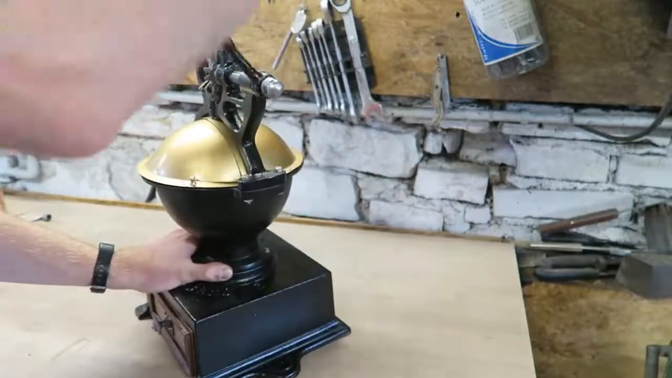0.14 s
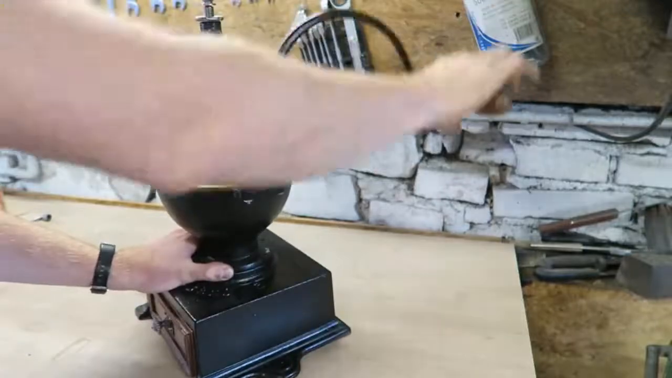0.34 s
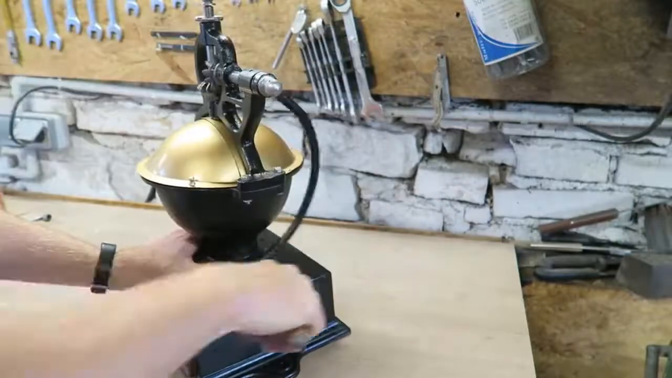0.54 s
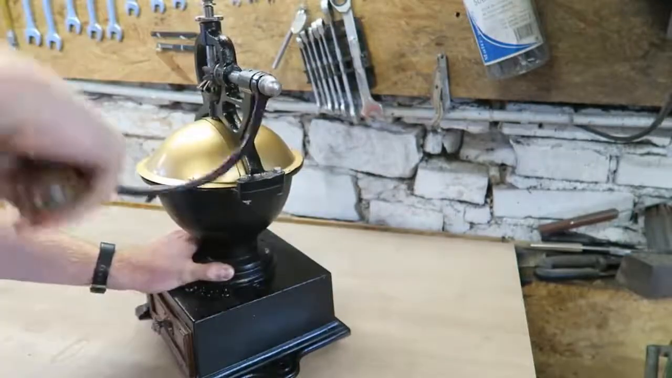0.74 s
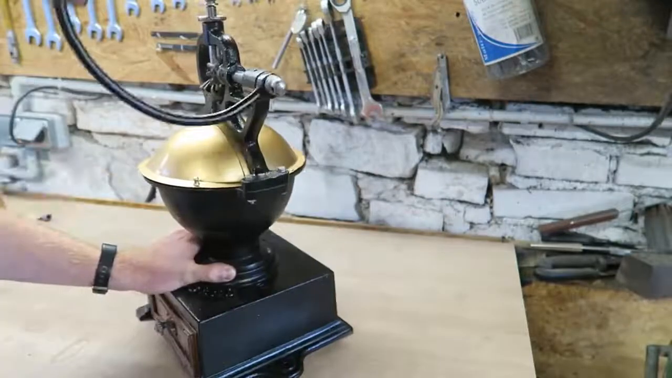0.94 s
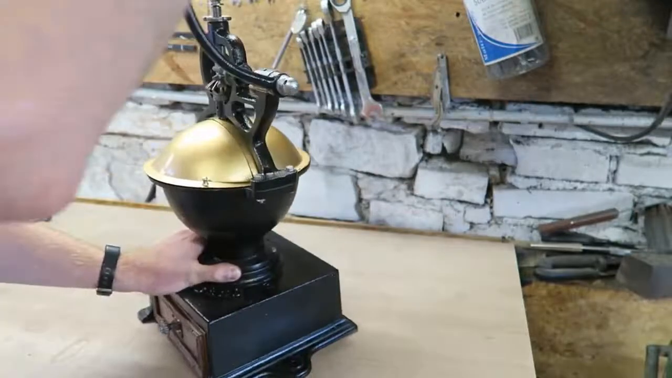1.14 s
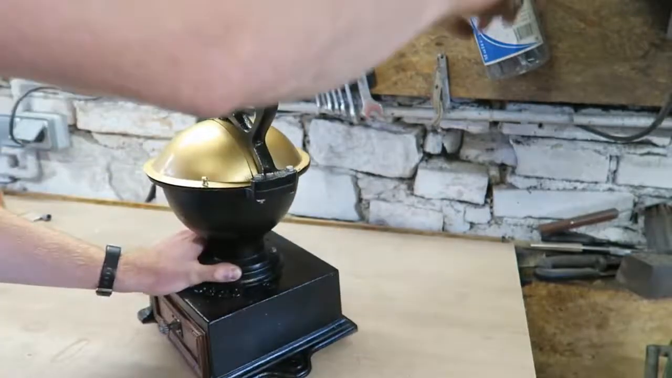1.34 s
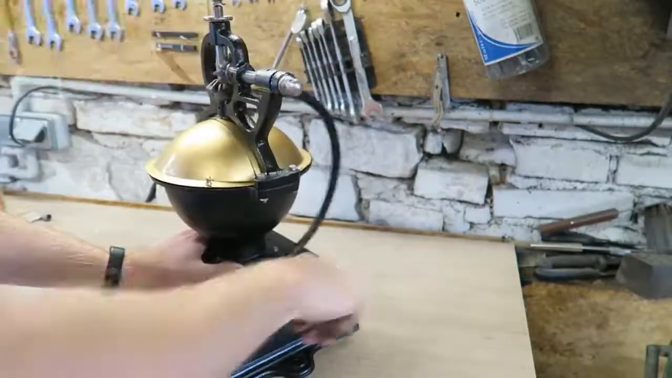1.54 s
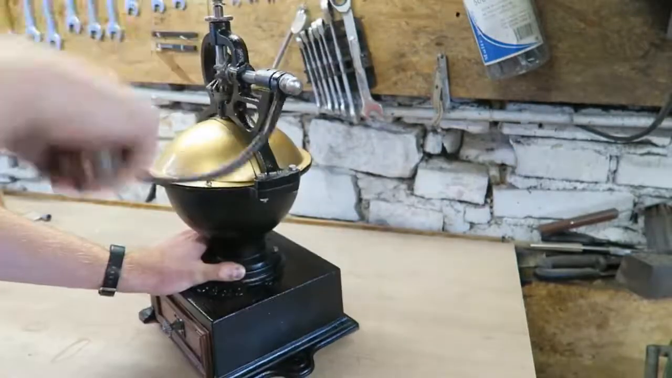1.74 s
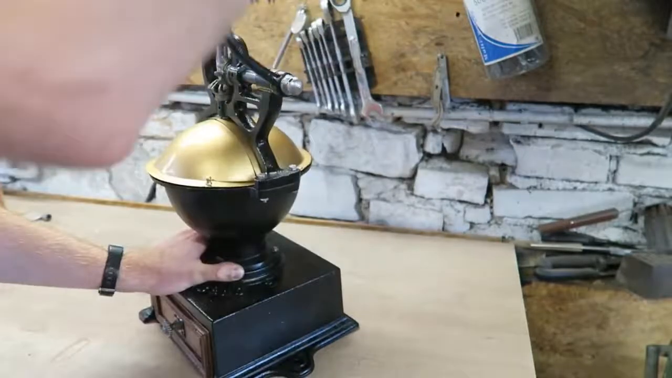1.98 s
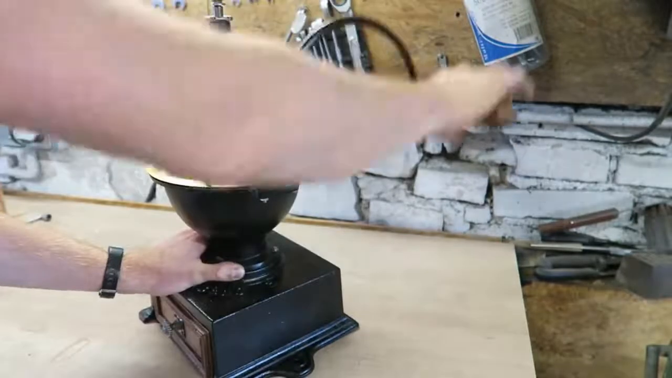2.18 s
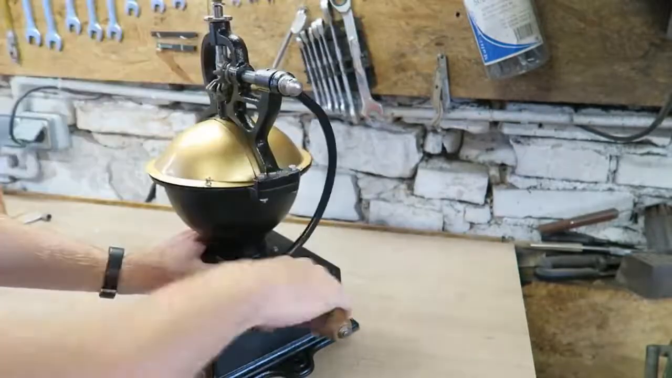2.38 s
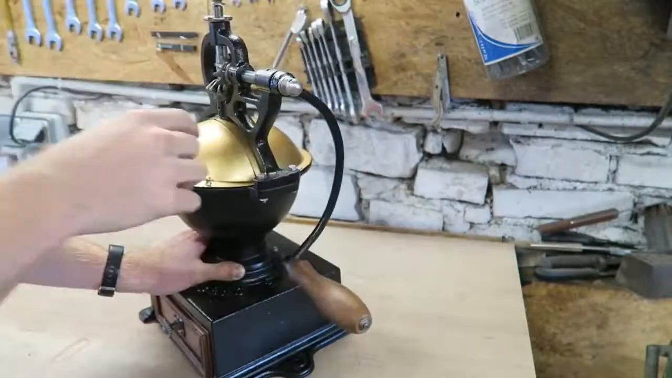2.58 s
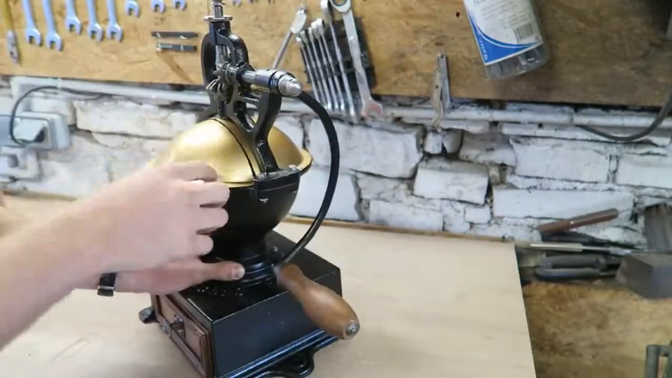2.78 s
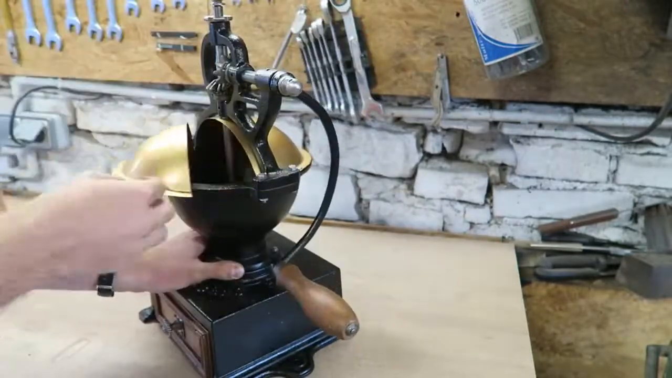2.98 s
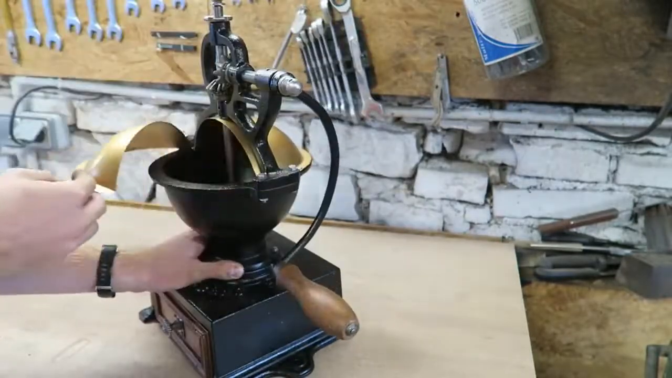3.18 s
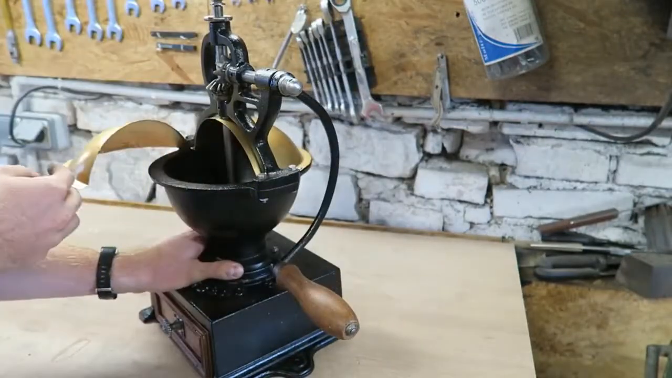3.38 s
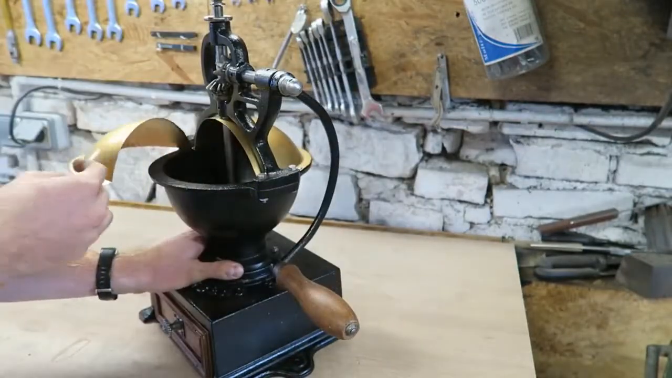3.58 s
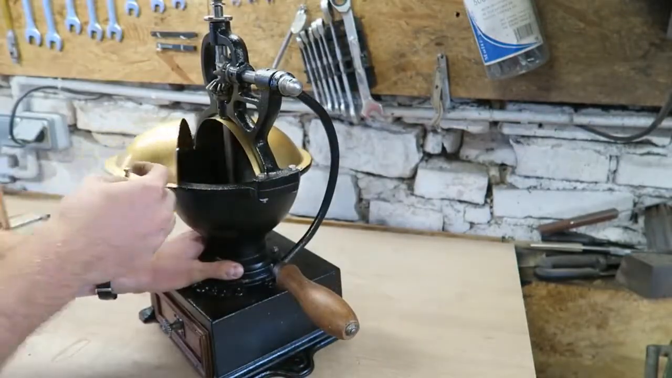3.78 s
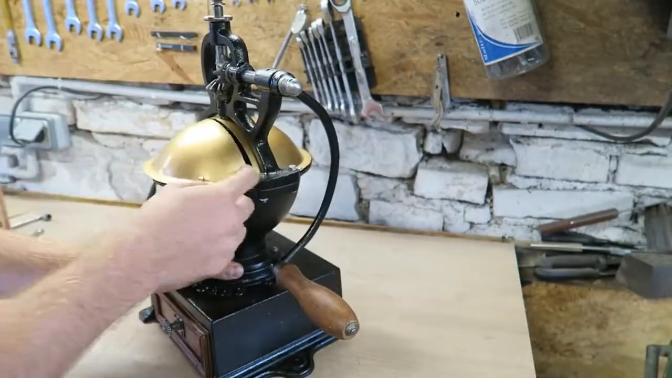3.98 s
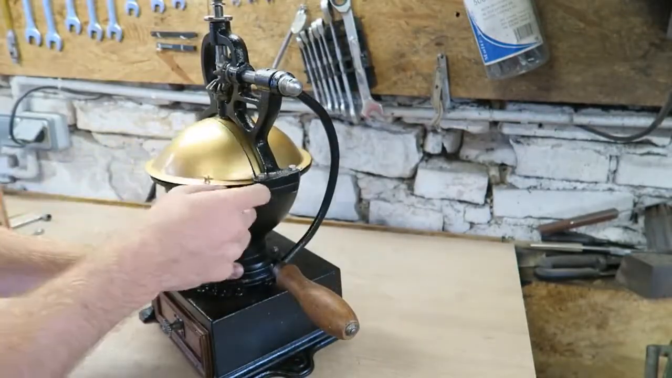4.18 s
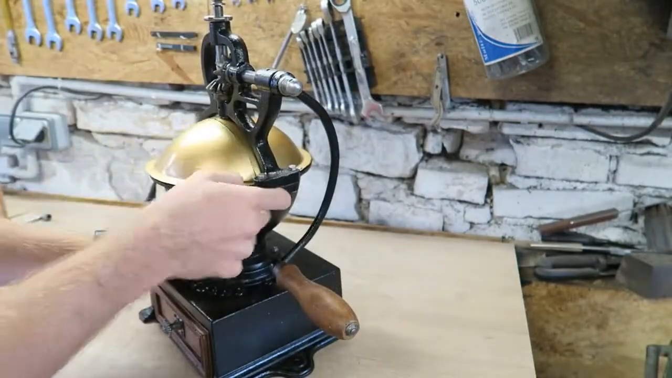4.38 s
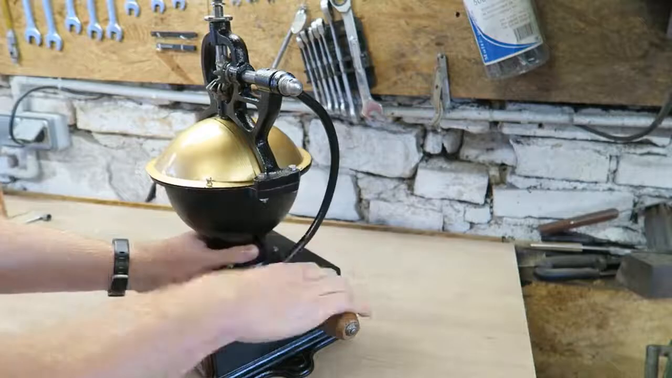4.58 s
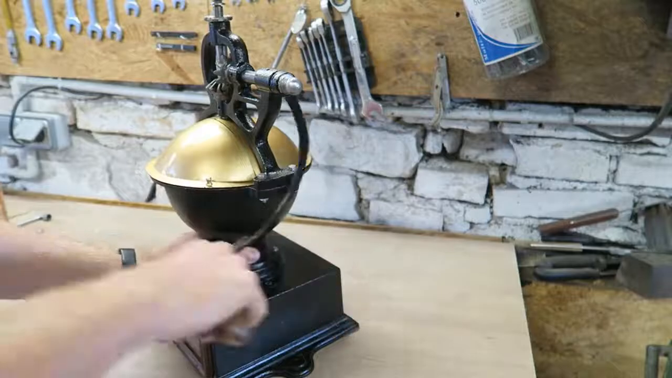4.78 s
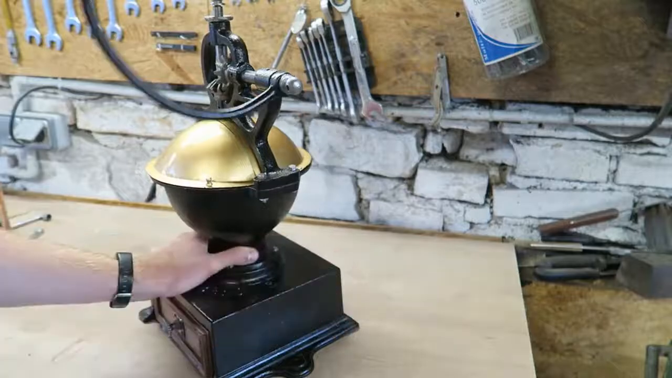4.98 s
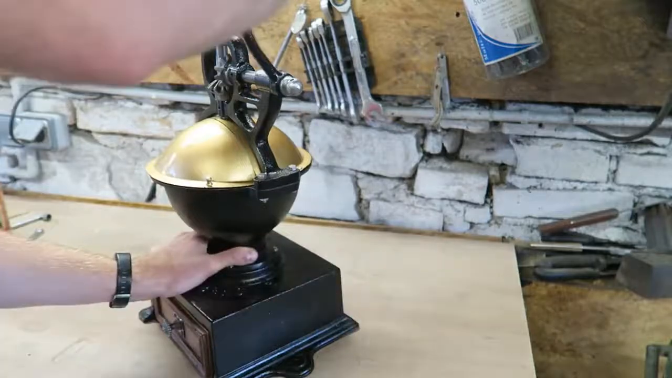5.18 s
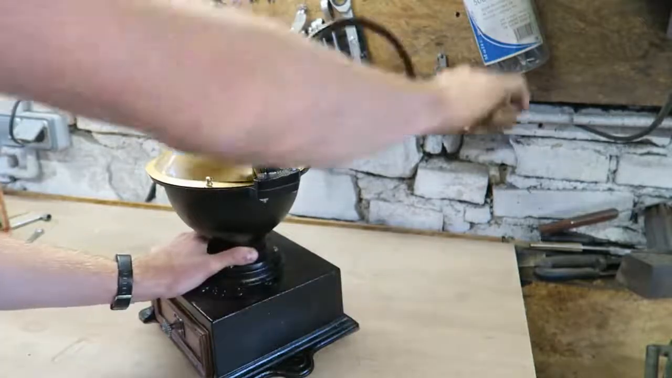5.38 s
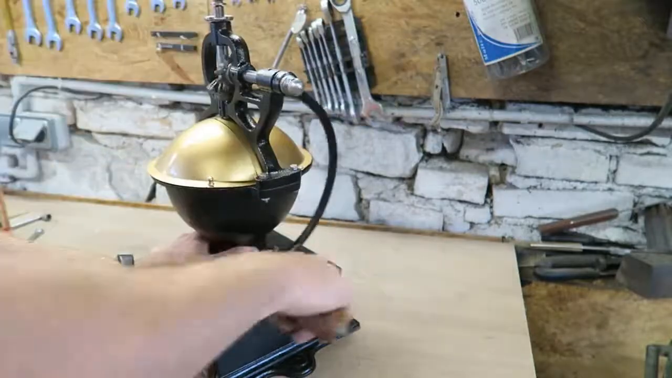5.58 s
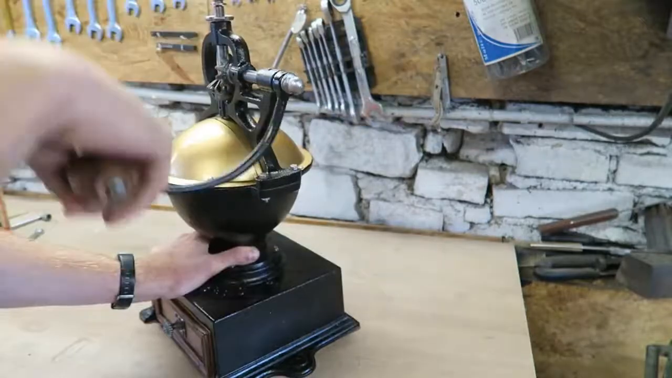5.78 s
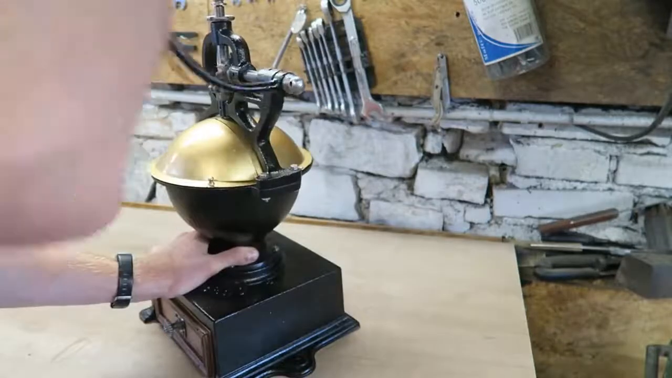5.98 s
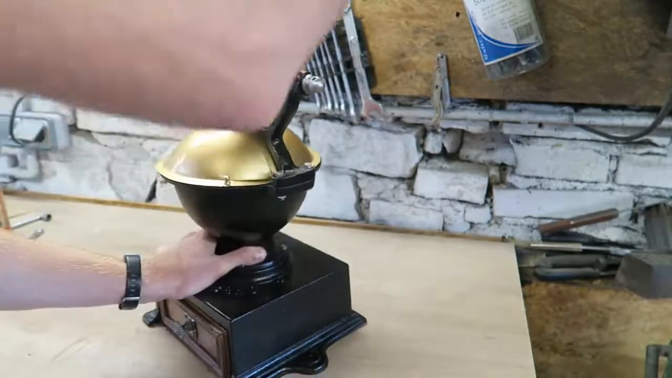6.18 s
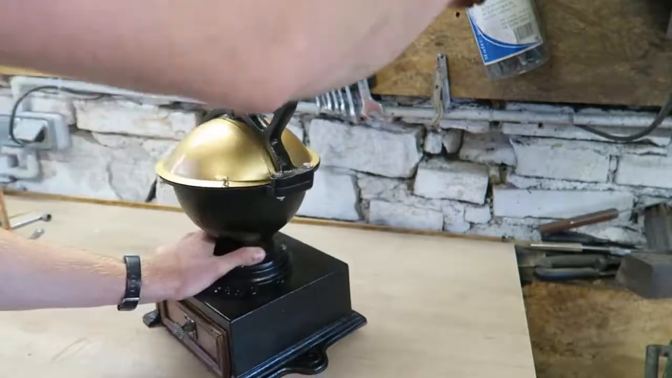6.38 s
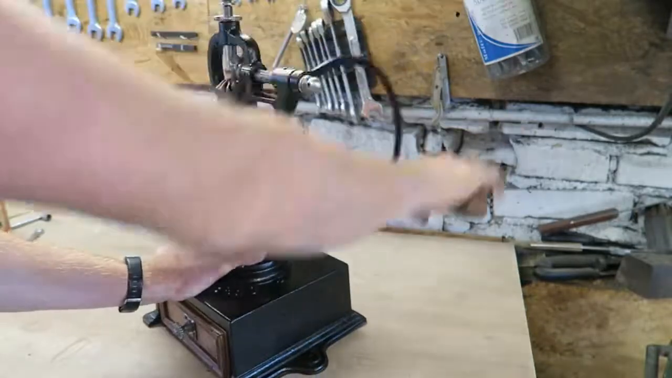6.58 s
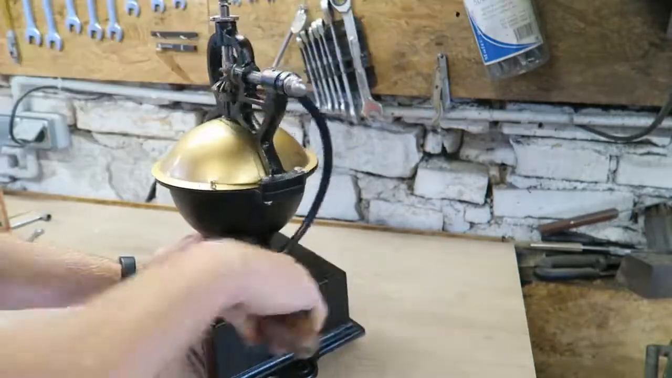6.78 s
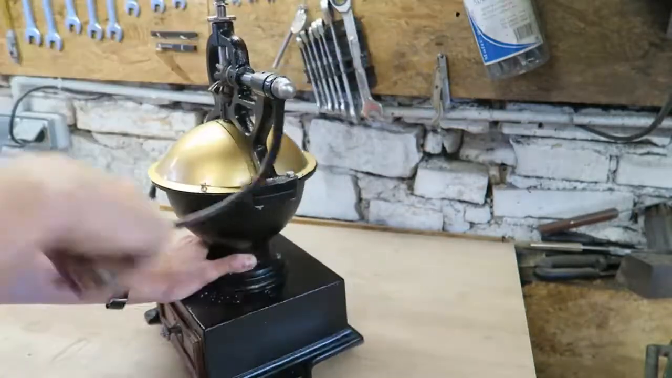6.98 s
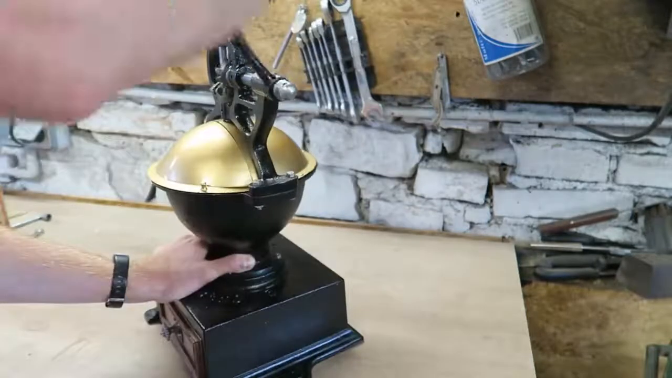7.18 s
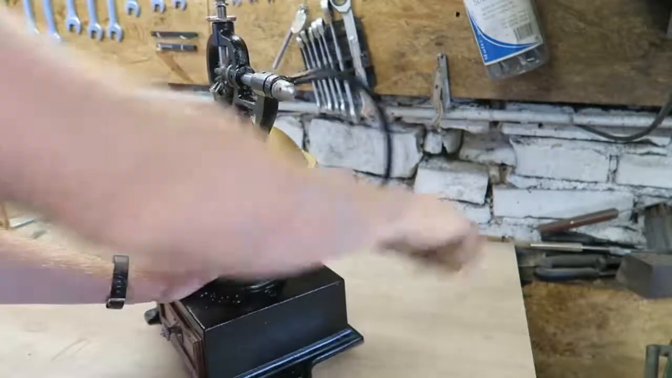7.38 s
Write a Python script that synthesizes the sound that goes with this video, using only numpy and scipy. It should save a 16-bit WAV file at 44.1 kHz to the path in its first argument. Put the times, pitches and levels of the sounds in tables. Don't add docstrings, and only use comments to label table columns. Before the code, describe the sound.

A hand-cranked cast-iron coffee mill crunches beans with a rough, hollow rasp, pauses while its thin brass lid scrapes open and knocks shut, then grinds on.

```python
import sys
import numpy as np
from scipy import signal
from scipy.fft import rfft, irfft, next_fast_len
from scipy.io import wavfile

SR = 44100
rng = np.random.default_rng(int(sys.argv[2]) if len(sys.argv) > 2 else 0)


def dump(signal):
    limited = np.clip(np.atleast_2d(signal).T, -1, 1)
    pcm = np.round(limited * 32767).astype(np.int16)
    wavfile.write(sys.argv[1], SR, pcm)


def to_linear_factor(level_db):
    exponent = np.asarray(level_db, float) / 20
    return 10 ** exponent


N = 328104

# (time [s], effort [dB], weight leaning on the base [dB], base mode favoured by the lean [Hz])
CRANK_ARM = [
    [(0.0, -28.5, 8.5, 280), (0.5, -28.5, 8.5, 268), (0.9, -28, 2.5, 270), (1.2, -31.5, 10.5, 310),
     (1.7, -25, 7.5, 296), (2.28, -33.5, 11.5, 256), (2.33, -45.5, 12.5, 300), (2.42, -61.5, 20, 340),
     (2.5, -80, 14, 340)],
    [(4.47, -71, 19, 190), (4.52, -66, 20, 180), (4.56, -61, 8, 200), (4.6, -36, 6, 250),
     (4.72, -29.5, 8, 257), (5.4, -28.5, 9.5, 280), (6.0, -30, 9, 293), (6.7, -29, 7.5, 250),
     (7.0, -27, 7.5, 288), (7.44, -30, 7.5, 265)],
]
# (time [s], length [s], change in effort
# [dB], change in weight [dB])
LOAD_CHANGES = [(0.187, 0.042, -4, 1.5), (0.749, 0.032, -19.5, 11), (0.9, 0.068, -6.5, 5),
                (1.038, 0.046, -3, 6.5), (1.128, 0.02, 3.5, -2), (1.258, 0.052, -1, -2),
                (1.533, 0.079, -4.5, 1), (1.7, 0.086, -7, -2), (2.052, 0.038, -4, -2),
                (2.235, 0.048, 2, -2), (5.007, .06, -1, -4.5), (5.194, 0.11, -2, -1.5),
                (5.454, 0.069, -0.5, -6.5), (5.755, 0.072, -0.5, -6.5), (5.88, 0.037, -3.5, 0),
                (6.09, 0.064, -6, -0.5), (6.178, 0.029, 1, -4.5), (6.363, 0.061, -11.5, 1),
                (6.724, 0.14, -4.5, -0.5), (7.366, 0.011, 3, -14),
                (0.002, 0.12, 0.5, 4.5), (0.348, 0.068, 1, 2.5), (0.628, 0.048, 1.5, 2),
                    (0.797, 0.032, -1.5, -5.5), (0.998, 0.012, 7, 0), (1.197, 0.06, 5, 1),
                    (1.318, 0.06, 2.5, 0.5), (1.47, 0.039, 0, 6), (1.565, 0.044, 0.5, 1.5),
                    (1.673, 0.037, 3.5, 4.5), (2.0, 0.16, 1.5, 1), (2.141, 0.061, 7, -1.5),
                    (2.266, 0.021, 6, -0.5), (4.717, 0.05, 1, 2.5), (4.928, 0.023, -3.5, 5.5),
                    (5.114, 0.055, 1, 2.5), (5.362, 0.067, 0, -0.5), (5.436, 0.022, -7, 14),
                    (5.547, 0.059, -1, -1), (5.745, 0.026, 3, 3), (6.046, 0.025, 3.5, -2.5),
                    (6.238, 0.037, -1, -2.5), (6.505, 0.062, 1, 4.5), (6.534, 0.014, -1.5, 2.5),
                    (6.943, 0.18, 1, 0), (7.06, 0.017, 0, 1), (7.19, 0.11, 2, 4), (7.293, 0.054, 3.5, 0.5),
                    (7.385, 0.034, 3, 3)]
# (time [s], rise of the rumble [dB])
BENCH_ROCKS = [(0.54, 12.5), (0.68, 5), (0.95, 3), (1.47, 6), (1.55, 5), (1.7, 4.5), (2.31, 11.5),
               (4.52, 5), (4.74, 5), (4.9, 9), (5.15, 2.5), (5.45, 9.5), (5.55, 3), (6.15, 9.5), (6.26, -3),
               (6.44, 3.5), (7.1, 2), (7.2, 10.5), (7.32, 2), (7.43, 12)]
# (time [s], peak [dB], jolt into the base [dB])
BEAN_SNAPS = [(0.3975, -20, -5), (0.457, -14, -1), (0.6494, -23, -7), (0.6831, -34, -6),
              (0.8006, -4.5, -5.5), (0.77, -19, -5), (0.9355, -14, -5), (1, -25, -5), (1.254, -15, -10),
              (1.6341, -10.5, 4), (1.068, -36, -2), (1.295, -10, -11), (1.3428, -6.5, -12),
              (1.571, -23, -4), (1.9685, -46, 1), (2.1193, -39, -15), (4.5857, -23, -11), (4.7325, -30, 6),
              (4.871, -23, -5), (4.944, -10.5, -6), (5.1286, -35, 8), (5.1762, -9, -12), (5.3307, -5, 5),
              (5.4154, -1.5, 2), (5.4654, -17, 9), (5.6813, -12.5, -4), (5.815, -11, -4), (5.922, -14, 6),
              (6.0097, -13, 0), (6.2502, -13, 8), (6.3694, -19, -5), (6.4899, -8, -7), (6.5887, -6.5, -2),
              (6.8124, -39, 2), (7.2571, 1, -6), (7.3695, -9, -10)]
# (time [s], peak [dB])
BEAN_KNOCKS = [(0.111, -17), (0.156, -13), (0.264, -12), (0.371, -6.5), (0.419, -21), (0.507, -12),
               (0.566, -16), (0.612, -14), (0.641, -10), (0.689, -20), (0.794, -20), (0.998, -17),
               (1.237, -18), (1.288, -13), (1.369, -11), (1.419, -13), (1.449, -12), (1.505, -10),
               (1.547, -14), (1.68, -12), (1.888, -12), (2.08, -9.5), (2.233, -18), (2.264, -18),
               (4.679, -14), (4.733, -13), (4.785, -17), (4.848, -19), (5.044, -17), (5.105, -11),
               (5.302, -16), (5.42, -12), (5.527, -13), (5.556, -15), (5.609, -13), (5.733, -13),
               (6.13, -19), (6.161, -16), (6.21, -19), (6.255, -16), (6.532, -9.5), (6.674, -23),
               (6.731, -15), (6.774, -19), (6.837, -11), (6.881, -14), (6.928, -16), (6.965, -14),
               (7.059, -17), (7.196, -7), (7.261, -7.5), (7.372, -10)]

# (pitch [Hz], width [Hz], level [dB])
BASE_MODES = [(89, 30, -22), (178, 18, -7), (228, 30, -4), (256, 26, 1), (298, 45, -5), (340, 40, -5),
              (435, 50, -6), (610, 70, -13), (785, 50, -10)]
# (pitch [Hz], width [Hz], level [dB])
FRAME_MODES = [(1415, 70, -0.5), (2180, 35, -6), (2535, 45, -8), (3003, 50, -10), (3265, 70, -10),
               (3540, 90, -10.5), (4300, 90, -12.5), (4635, 80, -10.5), (5630, 75, -11.5), (6150, 120, -18),
               (7220, 150, -21)]
# (pitch [Hz], width [Hz], level [dB])
HOPPER_MODES = [(970, 40, -20.5), (1635, 26, -15.5), (1782, 32, -13), (1956, 39, -8), (2366, 69, -13),
                (3450, 56, -25), (3720, 43, -11), (3910, 30, -14.5), (4480, 34, -19), (4890, 46, -16.5),
                (5217, 81, -14.5), (5830, 50, -23), (6720, 110, -23), (8240, 100, -26), (12150, 470, -28)]
# (frequency [Hz], level [dB])
BASE_TONE = [(20, -5.5), (135, -4), (170, -0.5), (900, 0), (2000, -28), (16000, -46)]
# (frequency [Hz], level [dB per Hz])
BENCH_TONE = [(12, -10), (45, -2.5), (91, 10), (134, 7), (150, -23), (200, -14), (330, -120)]
# (frequency [Hz], level [dB per Hz])
CRACKLE_TONE = [(290, -2), (500, 5), (1240, -5), (1410, -9), (1770, -6.5), (2200, 2), (2690, -14),
                (3590, 1.5), (5610, -9.5), (8890, -15.5), (10600, -16.5), (15600, -58)]

WALL_SINGS = [(0.019, 0.061, -31), (0.146, 0.072, -26), (0.272, 0.069, -30), (0.643, 0.12, -31),
              (0.793, 0.043, -27), (0.97, 0.038, -27), (1.055, 0.093, -20.5), (1.282, 0.092, -25.5),
              (1.546, 0.032, -38), (1.639, 0.057, -39), (1.777, 0.068, -31.5), (1.95, 0.21, -25.5),
              (4.74, 0.048, -40), (4.926, 0.072, -27), (5.044, 0.14, -24), (5.242, 0.11, -25),
              (5.473, 0.072, -37), (5.742, 0.079, -19.5), (5.928, 0.037, -18), (6.155, 0.044, -24),
              (6.49, 0.045, -31), (6.614, 0.044, -28), (6.839, 0.032, -31), (7.083, 0.22, -30.5),
              (7.394, 0.032, -38)]
# (start [s], length [s], level [dB])
BOX_SINGS = [(0.415, 0.043, -19), (0.611, 0.063, -18.5), (1.371, 0.027, -18), (2.151, 0.025, -20.5),
             (4.729, 0.031, -17.5), (5.132, 0.024, -18), (6.63, 0.096, -19.5), (6.729, 0.061, -15.5),
             (7.054, 0.033, -18.5), (7.252, 0.039, -22.5), (7.313, 0.1, -15), (7.395, 0.022, -18.5)]
# (start [s], length [s], level [dB])
FRAME_1415_SINGS = [(0.048, 0.13, -27.5), (0.257, 0.052, -33.5), (0.355, 0.02, -23.5), (0.601, 0.047, -31),
                    (0.784, 0.053, -30), (1.353, 0.03, -26), (1.63, 0.059, -31), (1.754, 0.02, -25),
                    (1.848, 0.031, -31), (2.804, 0.03, -35), (5.33, 0.041, -26), (5.414, 0.022, -19),
                    (6.12, 0.22, -35.5), (6.435, 0.083, -26.5), (6.912, 0.05, -31), (7.206, 0.096, -30.5)]
# (start [s], length [s], level [dB])
FRAME_SINGS = [(0.397, 0.132, -37), (0.571, 0.085, -36.5), (0.972, 0.05, -41), (1.353, 0.022, -35),
               (1.427, 0.12, -32.5), (1.568, 0.032, -29), (1.63, .03, -32), (2.061, 0.11, -35),
               (4.687, 0.043, -30), (4.835, 0.078, -37), (4.941, 0.056, -32), (5.32, 0.04, -40),
               (5.545, 0.098, -32.5), (5.677, 0.03, -37), (5.741, 0.108, -33), (6.485, 0.035, -31),
               (6.585, 0.061, -37), (6.819, 0.092, -42), (7.367, 0.064, -39)]

# (time [s], peak [dB], boom [dB],
# brightness # [dB])
LOOSE_TICKS = [
    (2.529, -53, 7, -9),
    (2.69, -31.5, 6, -14),
    (2.729, -45, 22, -28),
    (2.769, -32, -2, -21),
    (2.81, -23, -21, -21),
    (3.821, -45.5, 9, -5),
    (3.898, -53, -2, -1),
    (3.918, -22.5, 9, -14),
    (3.949, -38.5, 22, -26),
    (4.478, -61, -3, -12),
]
# (time [s], rise [s], dome boom [dB], scrape [dB], hiss [dB])
LID_STROKES = [
    (2.74, 0.13, -39, -64, -71),
    (2.772, 0.0091, -28, -55, -66),
    (2.816, 0.033, -37, -27.5, -47.5),
    (2.835, 0.024, -49, -41, -61),
    (3.905, 0.12, -50, -59, -66),
    (3.92, 0.0065, -19.5, -34.5, -37.5),
    (3.952, .006, -31, -43, -62),
]
# (boom, scrape, hiss) [dB per s]
STROKE_FALL = (317, 480, 700)
# (pitch [Hz], width [Hz], level [dB])
LOOSE_LOW_MODES = [(177, 37, -8.5), (330, 120, -3), (403, 78, 2.5), (440, 27, -29)]
# (pitch [Hz], width [Hz], level [dB])
LOOSE_DOME_MODES = [(1417, 37, 21.5), (2140, 56, 11.5), (3680, 81, 10), (4240, 120, -1), (5840, 300, -6),
                    (6850, 200, -10), (8160, 250, -14)]
# (frequency [Hz], level [dB per Hz])
LOOSE_FRICTION_TONE = [(290, -63), (500, 1), (1030, -15), (1410, -27), (1670, -17.5), (3700, -4.5),
                       (4650, -8.5), (6200, -6), (15600, -22)]
# (time [s], pitch [Hz], level [dB])
HINGE_JUDDER = [
    (2.69, 387, -53),
    (2.742, 382.7, -36),
    (2.797, 387.5, -34),
    (2.812, 445, -40),
    (2.82, 440, -35),
    (2.861, 465, -48),
]
# (time [s], level [dB])
EDGE_HITS = [
    (3.918, -24),
    (3.922, -26),
    (3.926, -29),
]
# (pitch [Hz], width [Hz], level [dB])
EDGE_MODES = [(3700, 150, -4), (5850, 160, 5), (6300, 200, -7), (8360, 250, -3), (9100, 250, -9)]
# (time [s], peak [dB], boom [dB], brightness [dB])
SEATED_TICKS = [
    (2.368, -29.5, 5.5, -12),
    (2.569, -45, 12, -7),
    (2.591, -45, 17, -16),
    (2.607, -34, 0, -36),
    (4.097, -41, 18, -25),
    (4.129, -16.5, -5, -7),
    (4.146, -30, -5, -22),
    (4.164, -30, -3, -23),
    (4.529, -35, 0, 6),
]
# (time [s], rise [s], boom [dB], scrape [dB], hiss [dB])
LID_RUBS = [
    (2.598, 0.004, -27, -44, -68),
    (2.592, 0.0073, -45, -48, -58),
    (4.098, .002, -23.5, -35, -64),
    (4.131, 0.003, -31, -30, -56),
    (4.155, .02, -38, -36, -58),
]
# (boom, scrape, hiss) [dB per s]
RUB_FALL = (226, 387, 560)
# (pitch [Hz], width [Hz], level [dB])
SEATED_LOW_MODES = [(94, 27, -7), (181, 27, -4.5), (314, 61, 6.5), (440, 47, 3.5)]
# (pitch [Hz], width [Hz], level [dB])
SEATED_DOME_MODES = [(710, 86, 8), (1150, 95, -3), (1370, 71, 6.5), (2160, 79, 1.5), (2460, 94, -0.5),
                     (3650, 200, -5.5), (4260, 60, -7)]
# (frequency [Hz], level [dB per Hz])
SEATED_FRICTION_TONE = [(290, -34), (500, 8.5), (1200, -17), (1370, -20.5), (2170, -20), (3110, -13),
                        (3590, -16), (4520, -18), (15600, -46)]

# (frequency [Hz], level below the sum [dB])
PORT_DIFFERENCE = [(60, -35), (110, -50), (200, -22.5), (380, -19.5), (700, -23.5), (1290, -21),
                   (2380, -19.5), (4400, -12.5), (8120, -6.5), (15000, -1)]
# (frequency [Hz], level [dB])
MICROPHONE_TREBLE = [(9000, -1.5), (10800, -4), (11800, -7), (12600, -6.5), (15500, -8)]
# (frequency [Hz], level [dB per Hz])
HUM_TONE = [(12, -38), (20, 5.5), (49, 1.5), (141, -9), (441, -13.5), (566, -19.5), (961, -19), (1100, -22),
            (1980, -25.5), (2550, -27.5), (3980, -32.5), (13200, -44.5), (15600, -66)]
# (frequency [Hz], level relative to the sum [dB])
HUM_DIFFERENCE = [(60, -24), (110, -3.5), (200, 4), (380, 8.5), (700, 6), (1290, 3), (2380, 1), (4400, 1.5),
                  (8120, 0), (15000, 1)]
# (time [s], peak [dB])
SEAM_CLICKS = [(0.0488, -37), (0.1281, -49), (0.2084, -43), (0.3686, -45), (0.4484, -41), (0.5686, -40),
               (0.6883, -38), (1.1682, -43), (1.2087, -40), (1.2885, -40), (1.4885, -39), (1.5284, -47),
               (1.6487, -45), (1.7684, -45), (1.8487, -44.5), (1.9285, -44), (1.9684, -40), (2.1665, -41),
               (2.2483, -46), (2.3688, -50), (2.5288, -62), (2.5688, -64), (2.7288, -58), (4.1287, -41),
               (4.5287, -59), (4.6884, -44), (4.7687, -40), (4.8485, -44), (4.9687, -45), (5.0885, -41),
               (5.2486, -43), (5.3284, -50), (5.3683, -42), (5.4087, -39), (5.7285, -38), (5.9685, -42),
               (6.1286, -43), (6.2084, -38), (6.4489, -42), (6.4888, -35), (6.6883, -48), (6.7687, -48),
               (6.8485, -40), (7.1687, -39), (7.2087, -37), (7.2486, -42), (7.2885, -37), (7.3688, -39),
               (7.4087, -36)]


def mill():
    shake, ring, crackle, rumble, lean_hz = crank()
    breaks = fractures(rate=1600, spread_db=0.0, clump_db=4.5)
    s, peak_db, jolt_db = np.transpose(BEAN_SNAPS)
    snaps = blows(s, peak_db - 17.5, burst_s=0.17)
    jolts = blows(s, peak_db + jolt_db - 4.0, burst_s=0.00061)
    knock_s, knock_db = np.transpose(BEAN_KNOCKS)
    jolts = jolts + kicks(knock_s, knock_db + 14)
    heavy = unit(1.2 * breaks + fractures(rate=600, spread_db=-1.5, clump_db=0.5))

    def push(hz):
        octaves_away = abs(np.log2(hz / lean_hz))
        favour = to_linear_factor(2.5 - np.minimum(11 * octaves_away, 6.5))
        return shake * favour * (0.5 * heavy + 0.7 * rng.standard_normal(N))

    def rasp(hz):
        drive = ring if hz < 2800 else to_linear_factor(7.5) * crackle
        return drive * (0.5 * breaks + 1.27 * rng.standard_normal(N))

    base = unevenly(BASE_MODES, push, jolts, rate=22, depth_db=3.0)
    out = to_linear_factor(19.5) * filtered(base, colour(BASE_TONE, 3.2, 16000))
    out += to_linear_factor(12.5) * unevenly(FRAME_MODES + [(10480, 560, -24)], rasp, snaps, rate=24, depth_db=3.0)
    out += to_linear_factor(11) * unevenly(HOPPER_MODES, rasp, snaps, rate=25, depth_db=4.5)
    out += to_linear_factor(-4) * crackle * chips()
    out += struck(to_linear_factor(2.5) * rumble * rng.standard_normal(N), colour(BENCH_TONE, 11, 121))
    out += struck(to_linear_factor(-4.0) * ring * breaks + to_linear_factor(-0.5) * snaps, colour(CRACKLE_TONE, 464, 3000))
    out += struck(to_linear_factor(-8.0) * crackle * breaks + to_linear_factor(-12.5) * snaps, colour(CRACKLE_TONE, 1990, 14600))
    return out


def crank():
    t = np.arange(N) / SR
    arm = np.zeros((3, N))
    for spell in CRANK_ARM:
        s, *curves = np.transpose(spell)
        arm += np.array([np.interp(t, s, curve, left=0, right=0) for curve in curves])
    effort, weight, lean_hz = arm
    turning = effort < 0
    usual_db = -30
    s, length, more, heavier = np.transpose(LOAD_CHANGES)
    load = effort + humps(s, length, more)
    shake = load + weight + humps(s, length, heavier)
    crackle = -35.5 + (load - usual_db) + 1.08 * wobble(5.2)
    rock_s, rock_db = np.transpose(BENCH_ROCKS)
    rumble = -43 + 0.22 * (effort - usual_db) + humps(rock_s, 0.08, rock_db)
    return *(turning * to_linear_factor([shake, load, crackle, rumble])), np.maximum(lean_hz, 1)


def unevenly(table, force, blow, rate, depth_db):
    out = np.zeros(N)
    for hz, width, db in table:
        feed = to_linear_factor(depth_db * wobble(rate) + singing(hz)) * force(hz) + blow
        pole = np.exp(-np.pi * max(width, 8) / SR)
        ringing = [1, -2 * pole * np.cos(2 * np.pi * hz / SR), pole ** 2]
        out += to_linear_factor(db) * (1 - pole) * signal.lfilter([1, 0, -1], ringing, feed)
    return out


def singing(hz):
    singers = {178: (WALL_SINGS, -41.5), 228: (BOX_SINGS, -25), 256: (BOX_SINGS, -25),
               1415: (FRAME_1415_SINGS, -32), 2180: (FRAME_SINGS, -43.5)}
    if hz not in singers:
        return 0
    moments, from_db = singers[hz]
    s, length, db = np.transpose(moments)
    return humps(s + length / 2, length, db - from_db)


def fractures(rate, spread_db, clump_db):
    chance, size, sign = rng.random(N), rng.exponential(size=N), rng.standard_normal(N)
    strength = to_linear_factor(spread_db * np.minimum(size, 3) + clump_db * wobble(45))
    return unit((chance < rate / SR) * sign * strength)


def chips():
    most, per_s, cycles = 5000, 500, 16.5
    where, chance = rng.random((2, most))
    pitch, size = rng.standard_normal((most, 1)), rng.exponential(size=(most, 1))
    hz = np.clip(3250 * 2 ** (0.71 * pitch), 900, 12000)
    k = np.arange(400)
    kept = chance[:, None] < per_s * N / SR / most
    level_db = 3 * np.minimum(size, 3) - 60 * k / SR * hz / cycles
    ring = kept * to_linear_factor(level_db) * np.sin(2 * np.pi * hz * k / SR)
    start = (where * N).astype(int)[:, None]
    return unit(np.bincount((start + k).ravel(), ring.ravel(), N + len(k))[:N])


def coasting():
    start_s, pitch_hz, t60_s, rise_s = 2.317, 335, 0.58, 0.02
    t = np.maximum(np.arange(N) / SR - start_s, 0)
    phase = 2 * np.pi * np.cumsum(pitch_hz * (1 + 0.0299 * wobble(40))) / SR
    level = to_linear_factor(-31 - 60 * t / t60_s + 3 * wobble(34.6))
    return level * (1 - np.exp(-t / rise_s)) * np.sin(phase)


def lid(taps, slide, low, high, friction):
    boom, scrape, hiss = slide
    grit = fractures(rate=5000, spread_db=-13.5, clump_db=1.5)
    s, peak_db, boom_db, bright_db = np.transpose(taps)
    tap = blows(s, peak_db - 8.0, burst_s=0.0052)
    bright_tap = blows(s, peak_db + bright_db - 21, burst_s=0.013)
    thump = kicks(s, peak_db + boom_db + 15.5)
    out = struck(to_linear_factor(-3.5) * boom * rng.standard_normal(N) + thump, modes(low))
    out += struck(to_linear_factor(-1.0) * scrape * grit + to_linear_factor(8.5) * tap, modes(high))
    out += struck(to_linear_factor(-2.5) * scrape * grit + tap, colour(friction, 705, 2360))
    out += struck(to_linear_factor(2.5) * hiss * grit + bright_tap, colour(friction, 2900, 16000))
    return out


def strokes(rows, fall_db_per_s):
    out = np.zeros((len(fall_db_per_s), N))
    t = np.arange(-SR // 4, SR // 4) / SR
    for s, rise_s, *db in rows:
        slope = np.where(t < 0, 15 / rise_s, -np.c_[list(fall_db_per_s)])
        out[:, round(s * SR) - SR // 4:][:, :len(t)] += to_linear_factor(2 * (np.c_[db] + slope * t))
    return np.sqrt(out)


def hinge():
    s, hz, db = np.transpose(HINGE_JUDDER)
    t = np.arange(N) / SR
    phase = 2 * np.pi * np.cumsum(np.interp(t, s, hz) * (1 + 0.016 * wobble(60))) / SR
    level_db = np.interp(t, s, db, left=-150, right=-150) + 6.0 + 1.2 * wobble(56)
    return to_linear_factor(level_db) * np.sin(phase)


def clack():
    s, db = np.transpose(EDGE_HITS)
    return struck(kicks(s, db + 12), modes(EDGE_MODES))


def scattered(x, t60):
    t = np.arange(SR // 4) / SR
    tail = rng.standard_normal(len(t)) * to_linear_factor(-60 * t / t60)
    return signal.fftconvolve(x, tail / np.linalg.norm(tail))[:N]


def diffused(x):
    z = signal.stft(x, nperseg=256)[2]
    turned = z * np.exp(2j * np.pi * rng.random(z.shape))
    return signal.istft(turned, nperseg=256)[1][:N]


def workshop():
    def tone(f):
        return to_linear_factor(along(HUM_TONE, f)) * np.array([np.ones_like(f), to_linear_factor(along(HUM_DIFFERENCE, f))])
    mid, side = filtered(rng.standard_normal((2, N)), tone)
    return to_linear_factor(-51.5 + 1.4 * wobble(8.8)) * np.array([mid + side, mid - side]) / np.std(mid)


def blows(times, db, burst_s):
    force, t = np.zeros(N + SR), np.arange(2048) / SR
    for s, level in zip(times, db):
        noise = rng.standard_normal(len(t))
        force[round(s * SR):][:len(t)] += to_linear_factor(level - 60 * t / burst_s) * noise
    return force[:N]


def kicks(times, db):
    return np.bincount(np.round(times * SR).astype(int), to_linear_factor(db), N)[:N]


def humps(times, lengths, db):
    out = np.zeros(N)
    for s, length, size in np.broadcast(times, lengths, db):
        a = max(round((s - 2 * length) * SR), 0)
        b = min(round((s + 2 * length) * SR), N)
        out[a:b] += size * np.exp(-2 * ((np.arange(a, b) / SR - s) / length) ** 2)
    return out


def wobble(rate):
    knots = rng.standard_normal(int(N * 200 / SR) + 4)
    place = np.arange(N) * min(rate, 200) / SR
    k = place.astype(int)
    ease = (1 - np.cos(np.pi * (place - k))) / 2
    return knots[k] * (1 - ease) + knots[k + 1] * ease


def modes(table):
    def response(f):
        total = 0
        for k, (hz, width, db) in enumerate(table):
            damping = 1j * f * width
            total = total + (-1) ** k * to_linear_factor(db) * damping / (hz * hz - f * f + damping)
        return total
    return response


def colour(points, lo_hz, hi_hz):
    def response(f):
        edges = np.sqrt((1 + (lo_hz / (f + 1)) ** 8) * (1 + (f / hi_hz) ** 8))
        gain = to_linear_factor(along(points, f)) / edges
        cepstrum = irfft(np.log(gain + 1e-7))
        cepstrum[1:len(f) - 1] *= 2
        cepstrum[len(f):] = 0
        return np.exp(rfft(cepstrum))
    return response


def struck(force, response):
    return filtered(force, lambda f: unit_gain(response(f)))


def filtered(x, response):
    m = next_fast_len(N + 8192)
    return irfft(rfft(x, m) * response(np.fft.rfftfreq(m, 1 / SR)), m)[..., :N]


def along(points, hz):
    f, v = np.transpose(points)
    return np.interp(np.log(hz + 1), np.log(f + 1), v)


def unit(x):
    return x / np.sqrt(np.mean(x ** 2) + 1e-20)


def unit_gain(gain):
    return gain / np.sqrt(np.mean(abs(gain) ** 2))


def spliced(x):
    s, db = np.transpose(SEAM_CLICKS)
    return x + kicks(s, db + 18)


def scene():
    dry = mill() + coasting() + hinge() + clack()
    dry += lid(LOOSE_TICKS, strokes(LID_STROKES, STROKE_FALL), LOOSE_LOW_MODES, LOOSE_DOME_MODES, LOOSE_FRICTION_TONE)
    dry += lid(SEATED_TICKS, strokes(LID_RUBS, RUB_FALL), SEATED_LOW_MODES, SEATED_DOME_MODES, SEATED_FRICTION_TONE)
    mid = dry + to_linear_factor(-17) * scattered(dry, t60=0.1)
    side = filtered(diffused(mid), lambda f: to_linear_factor(along(PORT_DIFFERENCE, f) + 2.5))
    ports = np.array([mid + side, mid - side])
    return filtered(ports, lambda f: to_linear_factor(along(MICROPHONE_TREBLE, f))) + workshop()


def top_cut(x):
    return signal.sosfilt(signal.butter(12, 15730, fs=SR, output="sos"), x)


def record(dry):
    return top_cut(spliced(dry))


dry = scene()
out = record(dry)
dump(out)
```